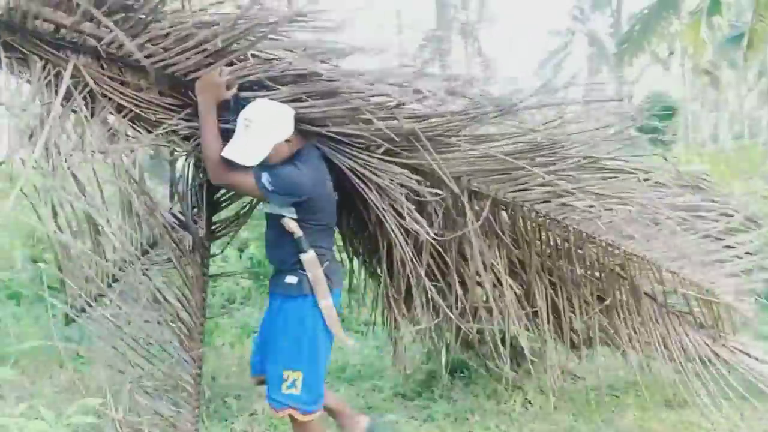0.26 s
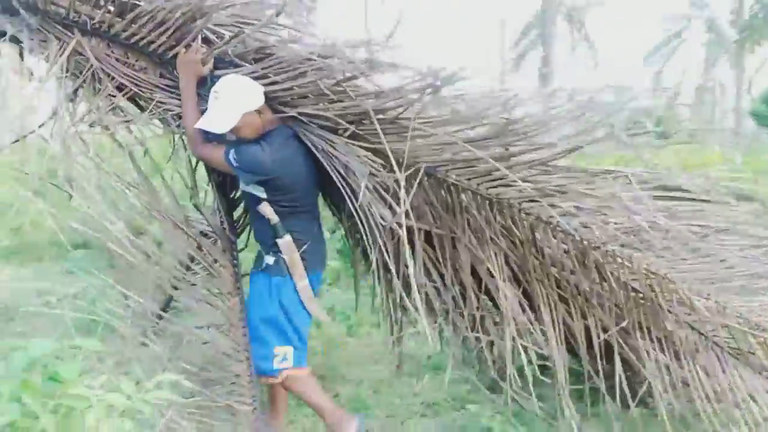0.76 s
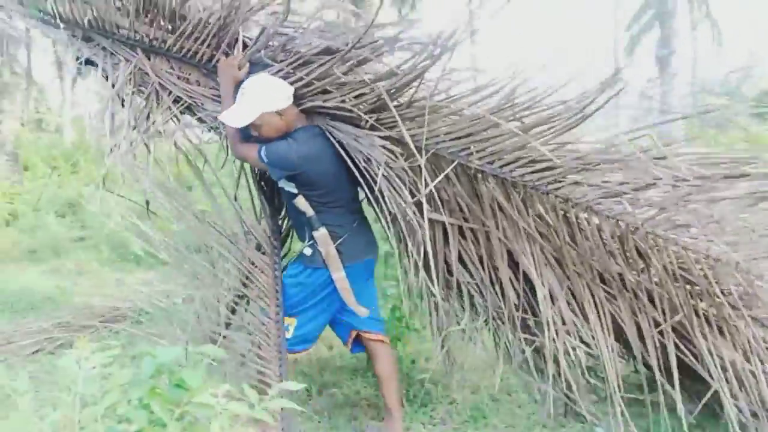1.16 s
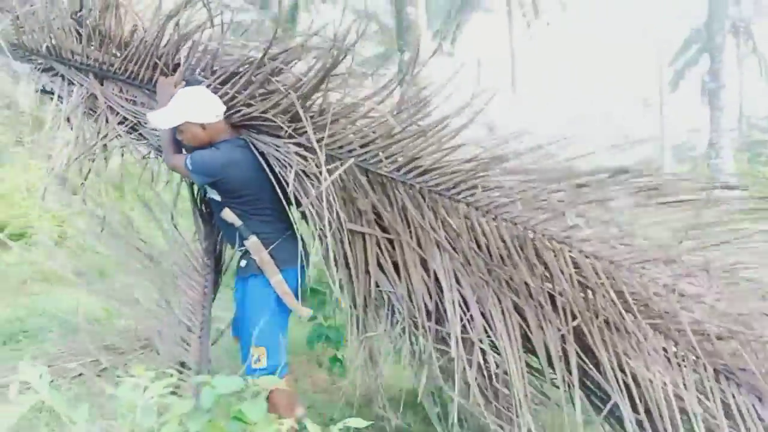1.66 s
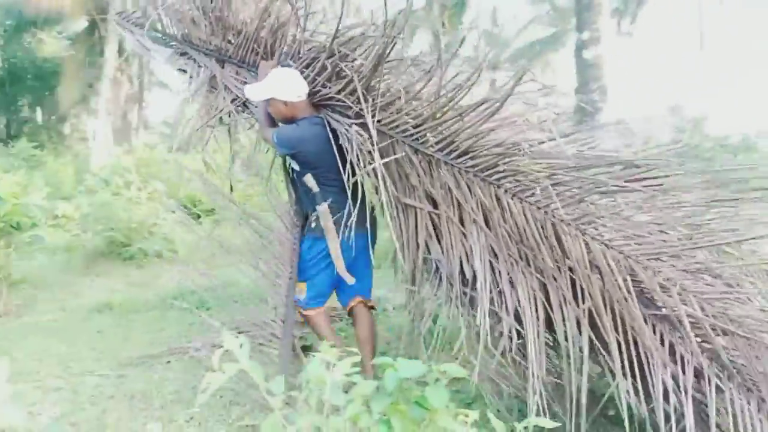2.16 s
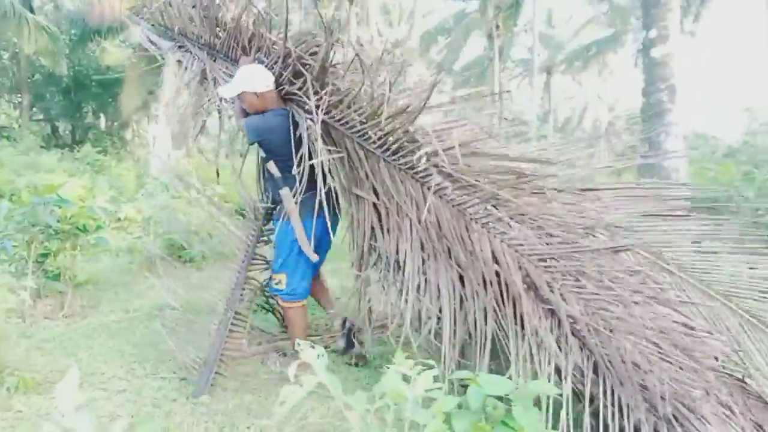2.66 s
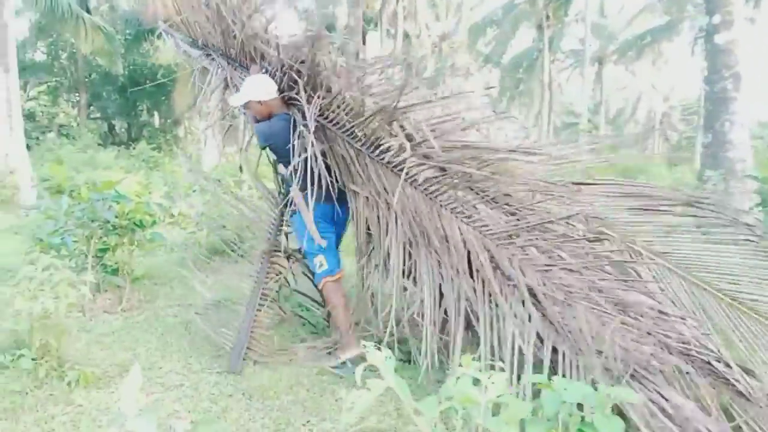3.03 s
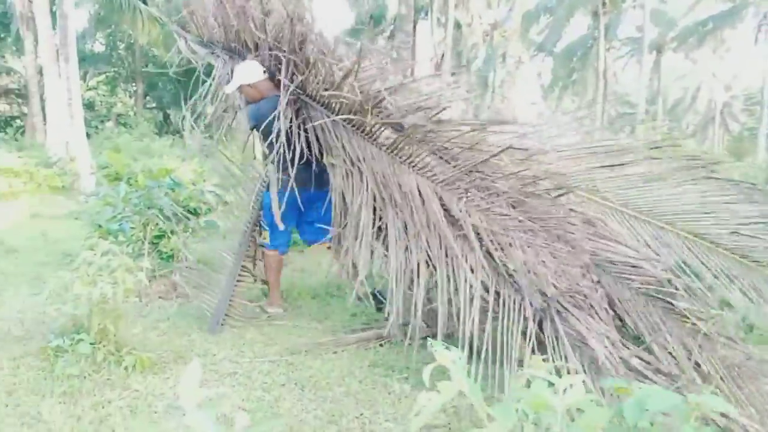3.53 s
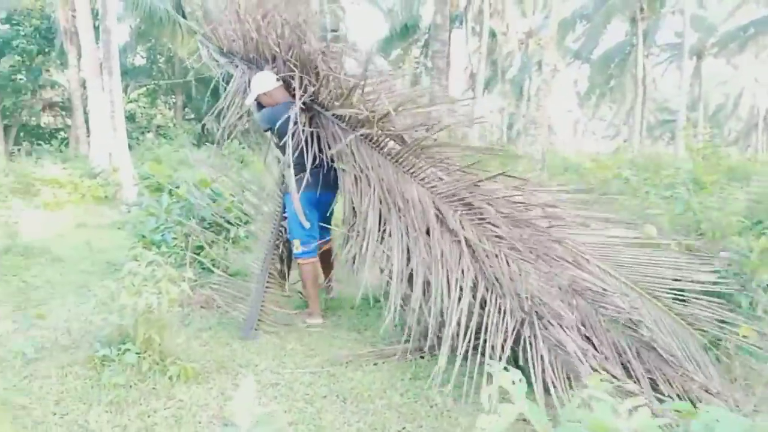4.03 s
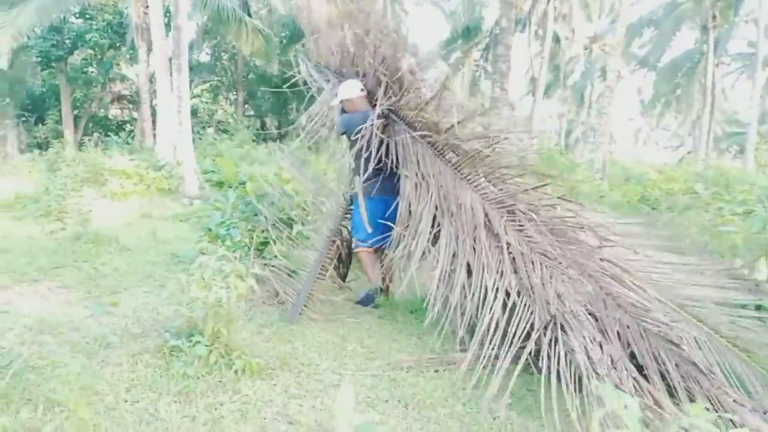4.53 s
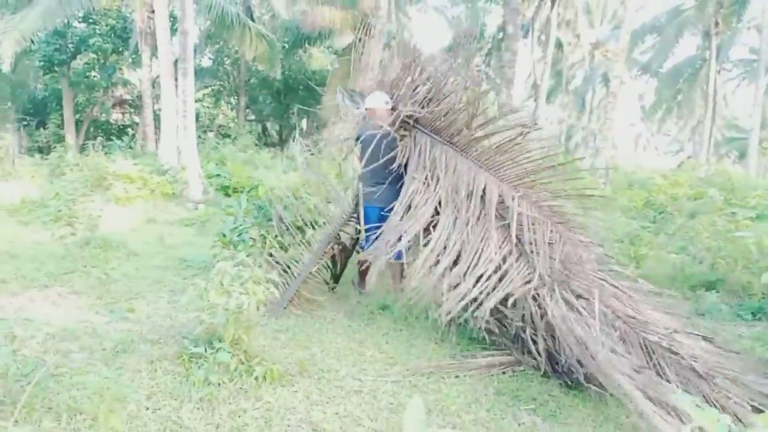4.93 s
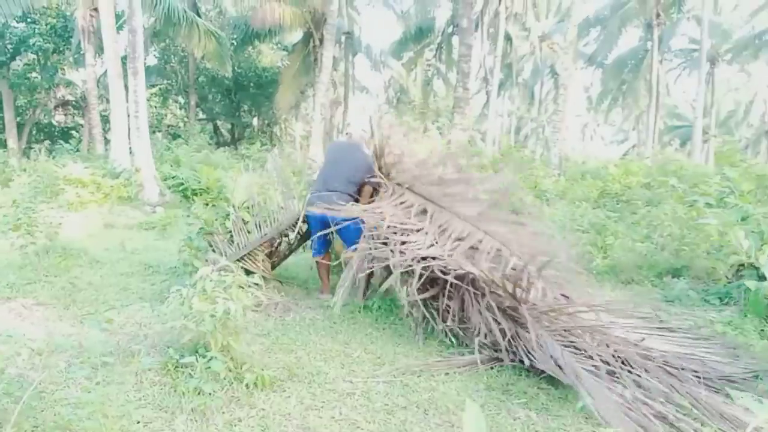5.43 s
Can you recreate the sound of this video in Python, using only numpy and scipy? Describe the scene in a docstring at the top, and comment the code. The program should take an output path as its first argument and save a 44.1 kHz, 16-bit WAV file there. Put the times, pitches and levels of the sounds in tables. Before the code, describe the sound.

Dry palm fronds rustle, scrape and crackle as a big bundle is dragged over grass, then dropped, above a low outdoor rumble.

```python
"""A big bundle of dry palm fronds is carried and dragged over grass a few metres away, above a low
outdoor rumble. From the start stiff leaflets tick and scrape in dense grains; some snap and set stems
ringing, midribs ping and hollow stalks knock. Midway a faint far whistle glides. The bundle moves off,
changes direction and at last is dropped. Throughout, two microphone ports, each with its own colour,
hear the bass alike and the treble apart."""
import sys
import numpy as np
from scipy import signal
from scipy.fft import rfft, irfft, next_fast_len
from scipy.io import wavfile
from scipy.ndimage import uniform_filter1d

SR = 44100
rng = np.random.default_rng(int(sys.argv[2]) if len(sys.argv) > 2 else 0)


def wrap_up_sound(samples):
    """Save the sound to the file named by the first command line argument, as 16-bit audio."""
    columns = np.atleast_2d(samples).T
    # keep every value between -1 and 1, then stretch to whole-number steps
    tamed = np.clip(columns, -1, 1)
    steps = np.round(tamed * 32767).astype(np.int16)
    wavfile.write(sys.argv[1], SR, steps)


N = 250929

# Leaflets snap, short and hard, or crumple, longer and softer. Each row: start in seconds, level in dB,
# thin leaflets over broad ones in dB, tips over broad leaflets in dB, decay time in ms.
SNAPS = [(0.0327, -18, -3, -20, 1.5), (0.2039, -11, 4, -7, 2.4), (0.231, -18.5, 3, -6, 1.6),
         (0.424, -22, -1, -20, 1.3), (.478, -24, 4.5, -11, 2), (0.542, -19.5, -4, -27, 5),
         (0.577, -29, 12, 4, 3), (0.639, -15, -7, -25, 2.9), (0.711, -17.5, 0, -14, 1),
         (0.7364, -18, -1, -8, 3.3), (0.812, -17, -5, -10, 3.6), (0.8849, -11, 3.5, -13, 1.3),
         (1.1424, -14.5, -17, -34, 1.6), (1.2599, -9, -7, -15, 0.99), (1.3476, -9.5, -3, -13, 1.7),
         (1.4515, -16.5, -3, -29, 5), (1.868, -19.5, -0.5, -28, 3.5), (2.39, -33, 21, -29, 2.2),
         (2.657, -18, -8, -25, 3), (2.8124, -12, -14, -29, 1.6), (2.95, -19, -8, -25, 3),
         (3.046, -14, -7, -25, 6.6), (3.1, -19, 2, -20, 4), (3.142, -9, -11, -28, 6.3),
         (3.156, -17, 5, -16, 3.3), (3.2315, -12, 2, 1.5, 1.5), (3.403, -17, -21, -13, 7.8),
         (3.458, -13.5, -4, -13, 7.8), (3.505, -16, -14, -27, 2.8), (4.139, -28, 16, 2, 2.2),
         (4.216, -27.5, 10, 2, 2), (4.257, -24, 4, -12, 1.5), (4.322, -27, 14.5, -5, 1.3),
         (4.418, -31, 14, -18, 1.2), (4.435, -31, 7, -22, 1.1), (4.486, -18, -13, -25, 1.3),
         (4.531, -28.5, 12.5, 10.5, 2.2), (4.624, -16, -6, -25, 2.2), (4.7018, -15.5, -21, -15, 2),
         (4.9237, -19, 5.5, -28, 1.1), (5.392, -16.5, -12, -28, 3.6), (5.463, -12.5, -10, -28, 10)]
# Response of the microphone ports. Each row: frequency in Hz, left gain in dB, right gain in dB.
PORTS = [(216, -28, -29), (590, -24, -23), (745, -26.5, -30), (1010, -22, -23.5), (1460, -24.5, -23.5),
         (2226, -20, -20), (2675, -20, -13.5), (3300, -23.5, -14.5), (3990, -23, -14.5), (4490, -19, -20),
         (4930, -11.5, -13), (5410, -7, -6), (5900, -12, -9), (7120, -21, -24), (9820, -36.5, -34.5),
         (14420, -33, -32.5), (15400, -47, -99)]


def gain_of(db):
    """Amplitude ratio: tenfold for every 20 dB."""
    return 10 ** (np.asarray(db) / 20)


def unit_rms(x):
    """Normalisation to a mean power of 1."""
    return x / np.sqrt(np.mean(x ** 2) + 1e-20)


def at_frequency(points, hz, column=1):
    """Interpolation of a spectrum table along a logarithmic frequency axis."""
    table = np.transpose(points)
    return np.interp(np.log(hz + 1), np.log(table[0] + 1), table[column])


def add(mix, start_s, sound):
    """Superposition: a sound adds to the mix from its start onward."""
    part = mix[round(start_s * SR):][:len(sound)]
    part += sound[:len(part)]


def port_response(band_hz, column):
    """Minimum phase: a port's gain within one band determines its causal impulse response."""
    hz = abs(np.fft.fftfreq(4096, 1 / SR)) + 1
    low, high = band_hz
    band_pass = 1 / np.sqrt((1 + (low / hz) ** 12) * (1 + (hz / high) ** 24))
    log_gain = np.log(gain_of(at_frequency(PORTS, hz, column)) * band_pass + 1e-6)
    phase = -signal.hilbert(log_gain).imag
    return np.fft.ifft(np.exp(log_gain + 1j * phase)).real[:2048]


def port_colour(pair, band_hz):
    """Convolution gives each of two signals the colour of one port, at unit mean power gain."""
    taps = np.array([port_response(band_hz, column) for column in (1, 2)])
    return signal.oaconvolve(pair, taps / np.sqrt((taps ** 2).sum() / 2), axes=1)[:, :N]


def at_ports(pair, patchy_db):
    """Partial coherence: the right port hears a delayed share of the left sound plus sound of its own."""
    # Likeness of the ports. Each row: frequency in Hz, coherence (0-1) in passing, coherence further off.
    coherences = [(500, .93, .95), (770, .55, .55), (1050, .85, .88), (1500, .45, .7), (1950, .45, .5),
                  (2400, .3, .7), (3200, .3, .2), (3900, .45, .55), (4500, .3, .35), (5200, .55, .3),
                  (6000, .35, .35), (9000, .25, .25)]
    # Lead of the left port. Each row: frequency in Hz, phase in radians in passing, the same further off.
    phase_leads = [(100, 0, 0), (1600, 0, .2), (2050, 3.4, 3.7), (2600, 7.2, 6.1), (3500, 9, 6.2),
                   (4200, 9.6, 8.8), (5200, 9.9, 9.6), (6200, 11.2, 15.4), (16000, 36, 30)]
    # Change of colour with distance. Each row: frequency in Hz, left gain in dB, right gain in dB.
    far_colour = [(493, 0, 0), (716, -2.5, -2.5), (960, 1, -1), (2350, 0, 2), (2640, -1, 2.5),
                  (2980, -2.5, -4.5), (3830, -3, 2), (4450, -2.5, -3.5), (4900, -0.5, 0)]
    turn_s, moving_off_s = (3.54, 3.82), (1.5, 5.4)
    hz, t, (left, independent) = signal.stft(pair, SR, nperseg=512, noverlap=384)
    hz = hz[:, None]
    turned = np.interp(t, turn_s, [0, 1])
    moved_off = np.interp(t, moving_off_s, [0, 1])
    coherence, lead = (at_frequency(table, hz, 1) * (1 - turned) + at_frequency(table, hz, 2) * turned
                       for table in (coherences, phase_leads))
    distance_db = np.array([at_frequency(far_colour, hz, column) * moved_off for column in (1, 2)])
    shared = left * gain_of(at_frequency(PORTS, hz, 2) - at_frequency(PORTS, hz, 1)) * np.exp(-1j * lead)
    right = coherence * shared + np.sqrt(1 - coherence ** 2) * independent
    # Leaves of different sizes take turns, so the colour drifts in patches of frequency and time.
    patches = uniform_filter1d(rng.standard_normal(left.shape), size=6, axis=0)
    patches = unit_rms(uniform_filter1d(patches, size=24, axis=1))
    spectra = np.array([left, right]) * gain_of(patchy_db * patches + distance_db)
    return signal.istft(spectra, SR, nperseg=512, noverlap=384)[1][:, :N]


def grains(busy, per_s, spread_db, decay_ms):
    """Shot noise: busy * per_s impacts a second, mostly small, form a power envelope of mean 1."""
    energies = gain_of(2 * spread_db * np.minimum(rng.exponential(1, N), 2.8))
    struck = rng.random(N) < busy * per_s / SR
    power = signal.lfilter([1], [1, -np.exp(-2000 / (decay_ms * SR))], energies * struck / busy)
    return power / power.mean()


def snap_envelope(register):
    """Brittle fracture: each leaflet releases its strain in a burst that decays exponentially."""
    out, ms = np.zeros(N), np.arange(1300) / SR * 1000
    echo = 0.16 * np.exp(-ms / 9)  # nearby leaves throw each crack back
    for start, level_db, thin_db, tips_db, decay_ms in SNAPS:
        register_db = {"broad": 0, "thin": thin_db, "stalks": -np.inf, "tips": tips_db}[register]
        rise = 1 - np.exp(-ms / (0.24 * decay_ms))
        add(out, start, gain_of(level_db + register_db) * rise * (np.exp(-ms / decay_ms) + echo))
    return out


def fronds():
    """Impact, friction and fracture excite four bands of noise; a harder pull is louder and denser."""
    # How hard the bundle moves. Each row: time in seconds, level of the broad leaflets in dB.
    drag = [(0.0, -22.5), (.06, -24.5), (.12, -29), (0.3, -32.5), (0.51, -29), (.6, -25), (.7, -30),
            (.82, -24.5), (.96, -28.5), (1.26, -29), (1.47, -24.5), (1.65, -30), (1.85, -28.5), (2.08, -23),
            (2.28, -25.5), (2.62, -24.5), (2.77, -26.5), (2.95, -25), (3.05, -22.5), (3.18, -19),
            (3.38, -25.5), (3.71, -23), (3.82, -28), (3.97, -29), (4.17, -32.5), (4.52, -27.5), (4.81, -30),
            (5.04, -26), (5.14, -24), (5.28, -24.5), (5.4, -20.5), (5.49, -17.5), (5.62, -15.5),
            (5.69, -16.5)]
    # Brightness of the rustle. Each row: time in seconds, treble over its usual level in dB.
    brightness = [(0, -1), (.3, -1.5), (.62, -4.5), (.85, 0), (1.25, -2), (1.9, -1.5), (2.15, 1),
                  (2.45, -0.5), (3.05, 0), (3.4, 0), (3.8, -2.5), (4.2, 0), (4.55, -1.5), (5.05, -3),
                  (5.3, -2), (5.69, -1.5)]
    usual_db, landing_s, landing_rise_s = -27, 5.45, 0.22
    t = np.arange(N) / SR
    pull_db = np.interp(t, *np.transpose(drag)) - usual_db
    bright_db = np.interp(t, *np.transpose(brightness))
    landed_db = 2.5 * np.clip((t - landing_s) / landing_rise_s, 0, 1)  # the stalks thud on the ground
    busy = gain_of(.35 * pull_db)
    ticks = grains(busy, per_s=400, spread_db=2.8, decay_ms=.9)
    scrapes = uniform_filter1d(grains(busy, per_s=60, spread_db=1.0, decay_ms=20.0), size=700)
    # Each row: register, band in Hz, level over the broad leaflets in dB, dB gained per dB of pull,
    # power shares of the common ticks, the common scrapes and the register's own ticks.
    registers = [("broad", (1500, 4500), 0, 1, .3, .12, .36),
                 ("thin", (4500, 8000), -1.43 + bright_db, .9, .26, .12, .38),
                 ("stalks", (170, 1500), -13.5 + landed_db, .72, .18, .12, .22),
                 ("tips", (8000, 17000), -11.0 + 0.61 * bright_db, .88, .2, .1, .3)]
    out = np.zeros((2, N))
    for register, band_hz, offset_db, follow, tick_share, scrape_share, own_share in registers:
        own_ticks = grains(busy, per_s=400, spread_db=2.4, decay_ms=3.2)
        blur = 1 - tick_share - scrape_share - own_share  # leaves too many and too far to tell apart
        power = tick_share * ticks + scrape_share * scrapes + own_share * own_ticks + blur
        level = gain_of(usual_db + offset_db + follow * pull_db)
        rustle = level * np.sqrt(power) * rng.standard_normal((2, N))
        cracks = snap_envelope(register) * rng.choice([-1, 1], (2, N))
        out += port_colour(rustle + cracks, band_hz)
    return at_ports(out, patchy_db=1.28)


def rumble():
    """Far low noise swells slowly; its long wavelengths reach both ports nearly alike."""
    # Spectrum of the rumble. Each row: frequency in Hz, relative spectral density in dB.
    spectrum = [(25, -28), (70, -0.5), (87, 4.5), (118, 1.5), (167, -5), (260, -36), (570, -120)]
    # Swell of the rumble. Each row: time in seconds, level in dB.
    swell = [(0, -46), (.3, -53), (.7, -44), (1.2, -46.5), (2.1, -45), (2.8, -45), (3.3, -49.5), (3.8, -47),
             (5.69, -47.5)]
    size = next_fast_len(N)
    common, apart = rng.standard_normal((2, size))
    colour = gain_of(at_frequency(spectrum, np.fft.rfftfreq(size, 1 / SR)))
    noise = irfft(rfft([common + 0.21 * apart, common - 0.12 * apart]) * colour, size)[:, :N]
    level = gain_of(np.interp(np.arange(N) / SR, *np.transpose(swell)))
    return level * unit_rms(noise)


def stems():
    """Free vibration: each snap rings the modes of a woody stem, whose size sets their pitch."""
    # Modes of a stem. Each row: nominal frequency in Hz, relative level in dB, 60 dB decay in seconds.
    modes = [(1043, 5.5, 0.017), (1820, 2, 0.022)]
    ring_db, pitch_spread = -16.5, .1
    out, t = np.zeros(N), np.arange(2000) / SR
    rise = 1 - np.exp(-t / 0.0003)
    tunings = 1 + pitch_spread * rng.uniform(-1, 1, (len(SNAPS), len(modes)))
    for (start, snap_db, *_), tuning in zip(SNAPS, tunings):
        ring = sum(gain_of(db - 60 * t / t60) * np.sin(2 * np.pi * hz * ratio * t)
                   for (hz, db, t60), ratio in zip(modes, tuning))
        add(out, start, gain_of(snap_db + ring_db) * ring * rise)
    return out


def midrib_pings():
    """Damped oscillation: a flicked stiff midrib, or a stem set ringing by a snap, sounds one clear note with a
    soft onset."""
    # Flicked midribs, and near 1860 Hz at 1.35 s a stem ringing on after its snap. Each row: start in seconds,
    # level in dB, pitch in Hz, decay time in ms.
    flicks = [(.0335, -16, 3900, 1.5), (.0575, -18, 5000, 2), (.1695, -19.5, 5700, 2),
              (.2085, -16, 3020, 2.5), (.4275, -22, 2970, 5), (.848, -18.5, 5370, 3),
              (1.1425, -16.5, 2600, 2.2), (1.26, -19.5, 2520, 3.3), (1.298, -32, 1010, 4.5),
              (1.3486, -20, 1860, 4), (1.3495, -16.5, 2960, 2.6)]
    left_over_right_db = -5
    out, ms = np.zeros(N), np.arange(1300) / SR * 1000
    for start, level_db, hz, decay_ms in flicks:
        age = 2 * ms / decay_ms
        envelope = age * np.exp(1 - age)
        add(out, start, gain_of(level_db) * envelope * np.sin(2 * np.pi * hz * ms / 1000))
    return out * gain_of([[left_over_right_db / 2], [-left_over_right_db / 2]])


def stalk_knocks():
    """Heavy damping: a struck hollow stalk rings for only a few cycles on two inharmonic modes."""
    # Blows on the stalks. Each row: start in seconds, level in dB, pitch of the lower mode in Hz.
    blows = [(0.426, -32.5, 520), (2.358, -29, 400), (4.8128, -25, 544), (5.559, -22, 198)]
    out, t = np.zeros(N), np.arange(1500) / SR
    rise = 1 - np.exp(-t / 0.00045)
    for start, level_db, hz in blows:
        lower = np.sin(2 * np.pi * hz * t) * np.exp(-t / 0.0046)
        upper = np.sin(2 * np.pi * 2.27 * hz * t) * np.exp(-t / 0.0036)
        add(out, start, gain_of(level_db) * (lower + upper) * rise)
    return out


def far_whistle():
    """Frequency modulation: a faint pure tone, perhaps a bird, glides in pitch."""
    # One list of points per whistle. Each row: time in seconds, pitch in Hz, level in dB before the fade.
    glides = [
        [(2.56, 1760, -44), (2.58, 1694, -33.5), (2.66, 1754, -41)],
    ]
    out = np.zeros(N)
    for points in glides:
        times, hz, level_db = np.transpose(points)
        t = np.arange(times[0], times[-1], 1 / SR)
        tone = np.sqrt(2) * np.sin(2 * np.pi * np.cumsum(np.interp(t, times, hz)) / SR)
        fade = np.hanning(len(t)) ** .5
        add(out, times[0], gain_of(np.interp(t, times, level_db)) * tone * fade)
    return out


def scene():
    """Superposition: the pressures of all sources add at the two ports."""
    return fronds() + stems() + midrib_pings() + stalk_knocks() + far_whistle() + rumble()


def record(dry):
    """Clipping holds the loudest cracks to full scale; a low-pass filter then limits the bandwidth."""
    low_pass = signal.firwin(511, cutoff=15750, window=("kaiser", 9), fs=SR)
    return signal.oaconvolve(np.clip(dry, -1, 1), low_pass[None], "same")


dry = scene()
out = record(dry)
wrap_up_sound(out)
```